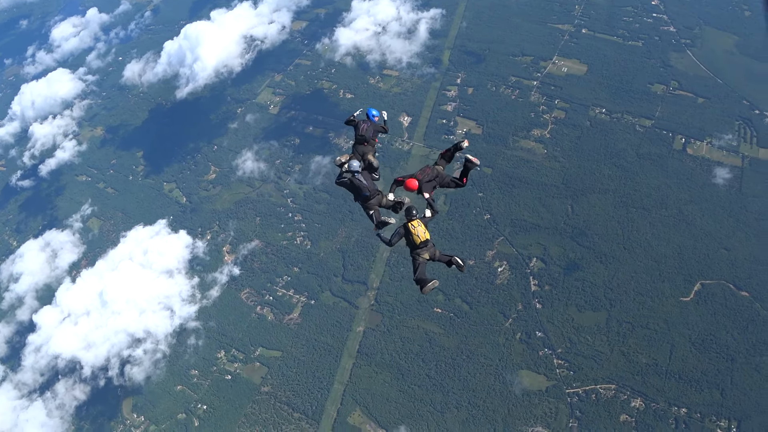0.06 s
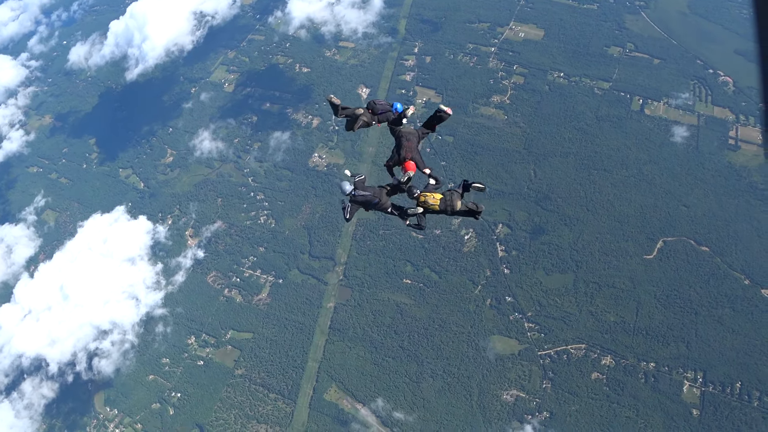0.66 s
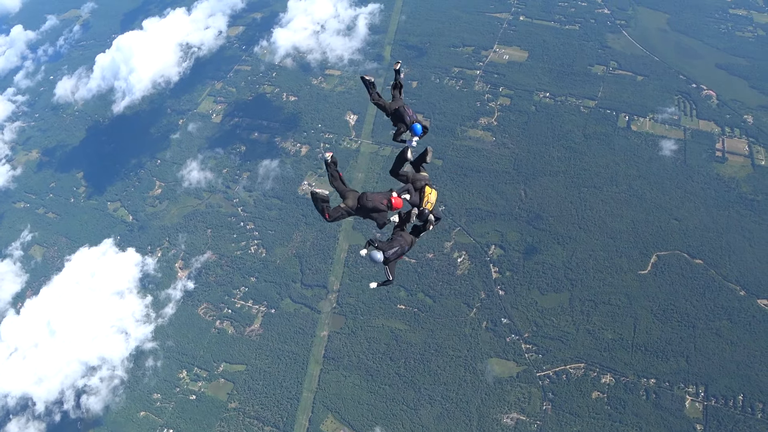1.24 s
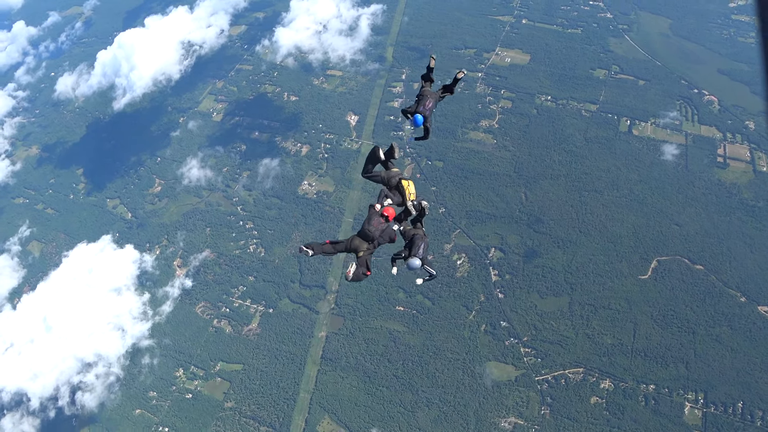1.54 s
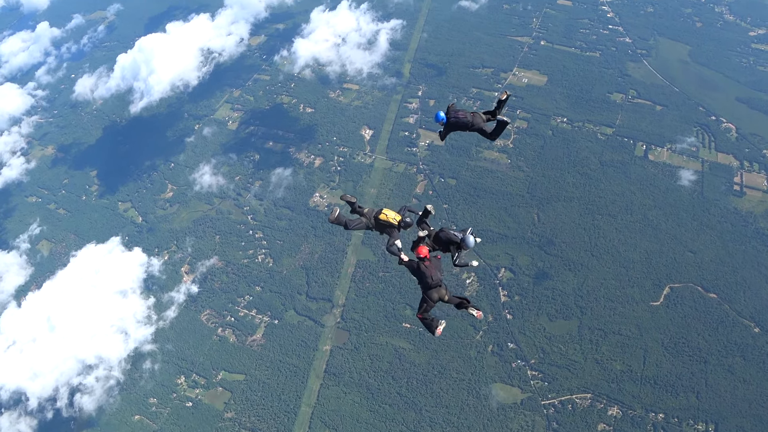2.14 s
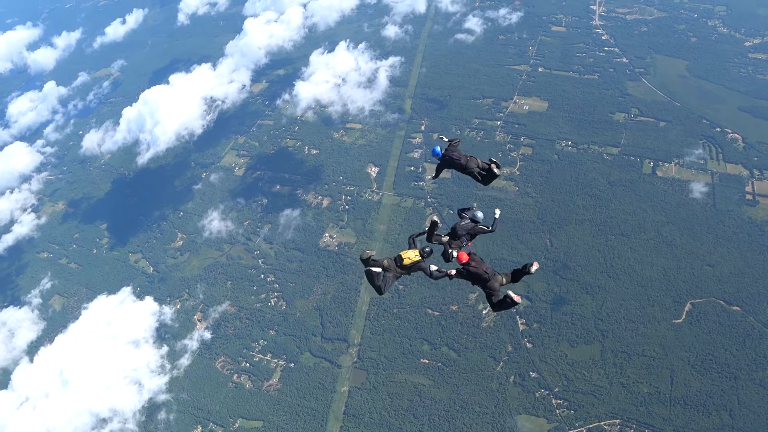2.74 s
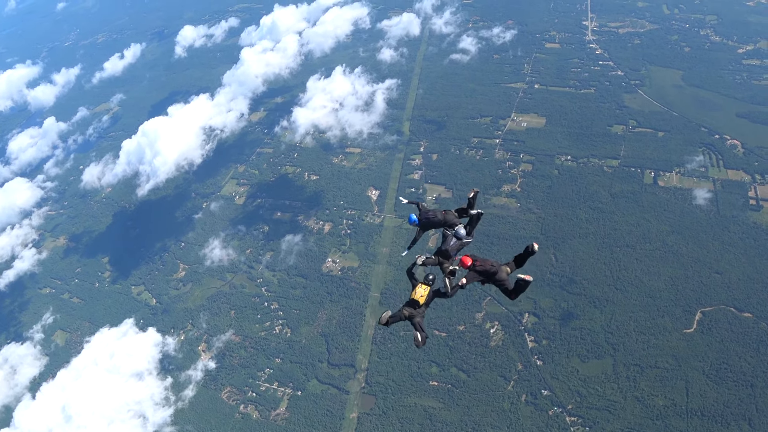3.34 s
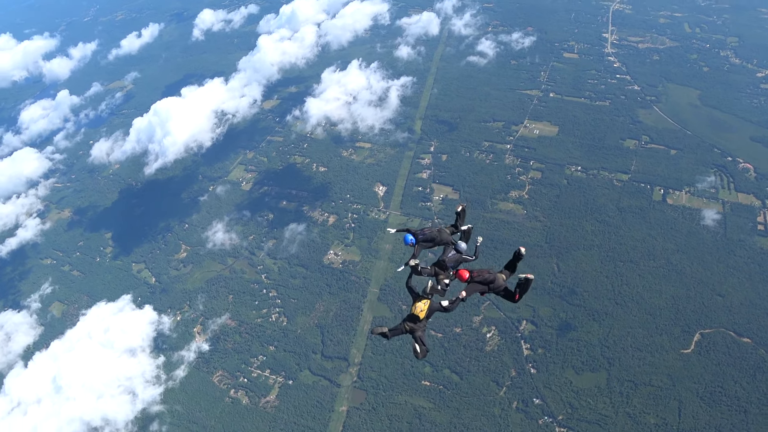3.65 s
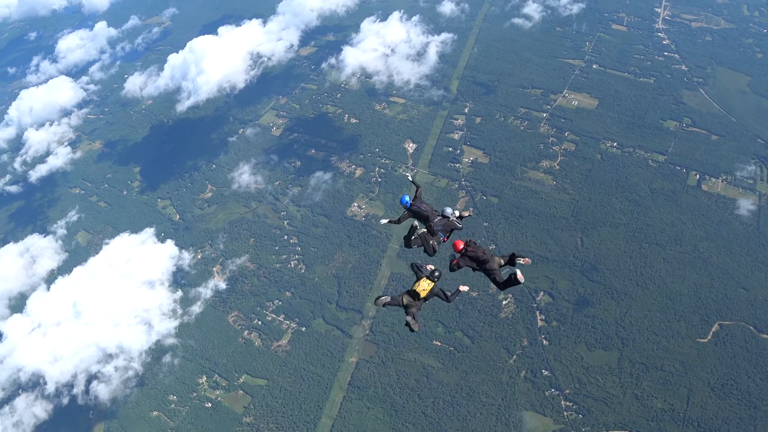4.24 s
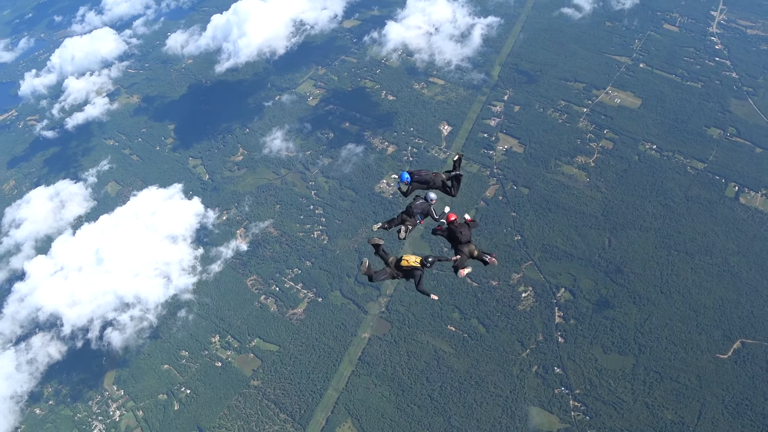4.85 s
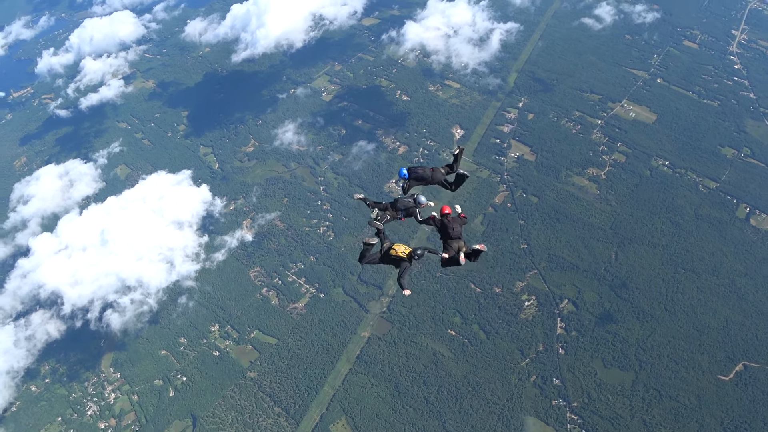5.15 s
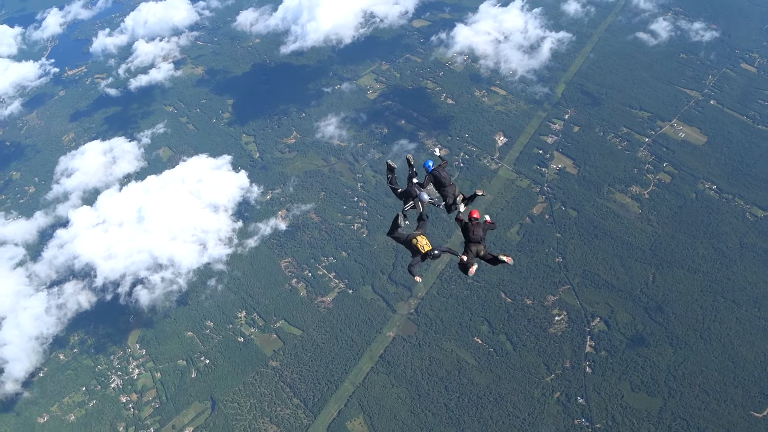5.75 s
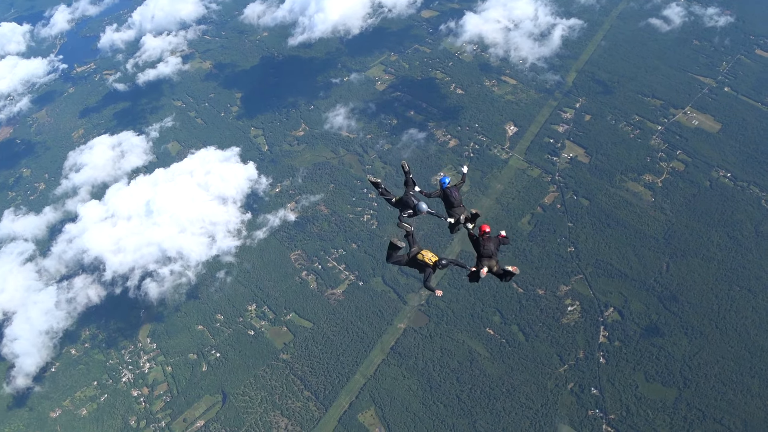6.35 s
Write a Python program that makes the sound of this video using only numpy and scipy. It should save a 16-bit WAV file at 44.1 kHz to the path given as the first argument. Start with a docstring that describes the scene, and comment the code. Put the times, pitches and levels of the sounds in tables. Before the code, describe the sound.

Air tears past a skydiver's helmet microphone in a constant loud rush, with low, fluttering gusts.

```python
"""Freefall: air tears past a helmet camera at terminal speed. From the start, large eddies buffet the
housing, smaller ones roar and rush in the two microphone ports, and the finest hiss and sputter.
The stream begins slightly left and centres within a second. As the helmet turns, the buffeting comes
and goes, hardest near 2.3 s: the roar swells with it and the hiss gives way. After 4 s it eases.
Throughout, the camera widens the port difference and levels the gusts; the loudest crests clip."""
import sys
import numpy as np
from scipy.fft import rfft, irfft
from scipy.io import wavfile
from scipy.ndimage import uniform_filter1d

SR = 44100
rng = np.random.default_rng(int(sys.argv[2]) if len(sys.argv) > 2 else 0)


def file_out(sig):
    """Save sig as 16-bit WAV at sys.argv[1]."""
    # one column per channel
    cols = np.atleast_2d(sig).T
    # limit, then scale
    lim = np.clip(cols, -1, 1)
    pcm = np.round(lim * 32767).astype(np.int16)
    wavfile.write(sys.argv[1], SR, pcm)


N = 291060


def undb(db):
    """Decibels to gain."""
    return 10 ** (np.asarray(db) / 20)


def colour(rows, hz):
    """Gain of a (frequency [Hz], level [dB]) table, joined on a log-frequency axis."""
    row_hz, row_db = np.transpose(rows)
    return undb(np.interp(np.log(hz), np.log(row_hz), row_db))


def curve(rows):
    """A (time [s], level [dB]) table at every sample."""
    return np.interp(np.arange(N) / SR, *np.transpose(rows))


def walk(rate_hz):
    """Random steps at rate_hz, smoothed twice; unit spread."""
    hold = max(int(SR / rate_hz), 2)
    steps = np.repeat(rng.standard_normal(N)[:N // hold + 1], hold)[:N]
    smooth = uniform_filter1d(uniform_filter1d(steps, hold), hold)
    return smooth / smooth.std()


def crossover(spectrum, hz, edge_hz):
    """Soft split of a spectrum into (below, above)."""
    below = 1 / (1 + (hz / edge_hz) ** 4)
    return spectrum * below, spectrum * (1 - below)


def low_pass(x, edge_hz, ramp_hz=60):
    """Brick-wall low-pass."""
    hz = np.arange(N // 2 + 1) * SR / N
    return irfft(rfft(x) * np.clip((edge_hz - hz) / ramp_hz + .5, 0, 1), N)


BAND_TOP_HZ = 11020
# Pressure common to both ports: (frequency [Hz], relative density [dB])
PRESSURE_SPECTRUM = [(20, -21), (45, -14.5), (70, -12.5), (110, -8), (170, -5), (280, -3.5), (560, -0.16),
                     (1000, -1.18), (1600, -3), (3000, -8), (5200, -13.5), (7800, -14.5), (9100, -18.5),
                     (11000, -17.5)]
# Port difference over common pressure: (frequency [Hz], level [dB])
PORT_DIFFERENCE = [(30, -12), (70, -8), (140, -5.5), (260, 0.5), (500, 3), (1000, 6), (1800, 6.5),
                   (3500, 4), (6000, 1), (10000, -2.5)]


def turbulence(hz, level_db=-13.5, cavity_hz=8000, cavity_width_hz=2100, cavity_db=1.36):
    """Pressure spectra at the left and right port: bass alike, middle opposed, treble unrelated."""
    resonance = undb(cavity_db / (1 + (2 * (hz - cavity_hz) / cavity_width_hz) ** 2))
    shape = colour(PRESSURE_SPECTRUM, hz) * resonance * (hz < BAND_TOP_HZ)
    common, difference = rfft(rng.standard_normal((2, N))) * shape
    difference = difference * colour(PORT_DIFFERENCE, hz)
    ports = np.array([common + difference, common - difference])
    return ports * undb(level_db) / irfft(common, N).std()


# Buffeting against its usual strength: (time [s], level [dB])
BUFFET_LEVEL = [(0, 1.5), (0.18, 0.5), (0.26, -3.5), (0.82, -3.5), (1.02, 2), (1.13, 5), (1.32, 0),
                (1.53, -2.5), (1.76, -1.5), (1.84, 3), (2.0, 4.5), (2.08, 1.5), (2.26, 8), (2.33, 6),
                (2.41, 6.5), (2.58, 3), (2.84, 4.5), (3.26, 0.2), (3.45, 6), (3.57, 1), (3.67, 5),
                (3.78, 2.5), (3.9, 4.5), (4.04, -0.5), (4.2, -1), (4.9, -1), (5.23, 1), (5.32, -2),
                (5.85, -2.5), (6.6, -1)]


def gusts(spread_db=0.5, rate_hz=23):
    """Buffeting in dB: slow swings as the helmet turns, quick random gusts on top."""
    return curve(BUFFET_LEVEL) + spread_db * walk(rate_hz)


def buffet(spectrum, gust_db, lump_db=1.05, lump_hz=26):
    """Large eddies shed from the helmet hit the housing in lumps."""
    return irfft(spectrum, N) * undb(gust_db + lump_db * walk(lump_hz))


# Roar before gusts and surges: (time [s], level [dB])
ROAR_BASE = [(0, -3), (0.4, -2.4), (0.95, -3), (1.2, -3), (1.7, -0.5), (2.22, -3), (2.4, -0.3), (2.78, 2.5),
             (3.1, 0.8), (3.6, 1.3), (3.9, 0.2), (4.4, 0.5), (5.5, 0), (5.95, -1), (6.6, 1.2)]


def roar(spectrum, gust_db, surge_db, gust_slope=0.75, flutter_db=0.64, flutter_hz=40):
    """Middle eddies tumble across the ports, fluttering and swelling with the buffeting."""
    level_db = curve(ROAR_BASE) + gust_slope * gust_db + surge_db
    return irfft(spectrum, N) * undb(level_db + flutter_db * walk(flutter_hz))


# Rush before gusts and surges: (time [s], level [dB])
RUSH_BASE = [(0, 0.5), (0.45, -0.2), (1.2, 1), (2.3, -1), (2.97, 0.5), (3.3, -0.6), (5.0, -0.5), (5.85, -2),
             (6.6, 0)]


def rush(spectrum, gust_db, surge_db, gust_slope=-0.19, surge_slope=0.17, flutter_db=1.18, flutter_hz=40):
    """Small eddies stream past in a coarse rush that yields slightly to the buffeting."""
    level_db = curve(RUSH_BASE) + gust_slope * gust_db + surge_slope * surge_db
    return irfft(spectrum, N) * undb(level_db + flutter_db * walk(flutter_hz))


def hiss(spectrum, gust_db, gust_slope=-0.33, duck_from_db=4.5, duck_slope=0.97):
    """Fine hiss sputters in bursts of a millisecond or two; it ducks under hard buffeting."""
    duck_db = duck_slope * np.maximum(gust_db - duck_from_db, 0)
    flicker_db = 0.85 * walk(rate_hz=40)
    sputter_db = 0.84 * walk(rate_hz=700)
    return irfft(spectrum, N) * undb(gust_slope * gust_db - duck_db + flicker_db + sputter_db)


def yaw(left_lead_db=1.1, centred_s=0.98):
    """Port gains: the stream favours the left, then centres."""
    lead_db = left_lead_db * np.maximum(1 - np.arange(N) / SR / centred_s, 0)
    return undb(np.array([lead_db, -lead_db]) / 2)


# Surges of the roar: (crest time [s], length [s], level [dB])
ROAR_SURGES = [(0.56, 0.1, 4), (1.84, 0.19, 3.5), (4.89, 0.22, 0.7), (5.2, 0.24, 2.5)]


def surges():
    """Boost in dB as the stream catches the ports, each a smooth rise and fall."""
    t = np.arange(N) / SR
    return sum(crest_db * np.cos(np.pi * np.clip((t - crest_s) / length_s, -.5, .5)) ** 2
               for crest_s, length_s, crest_db in ROAR_SURGES)


def scene():
    """One turbulent stream, split by eddy size; it sounds deeper and duller under hard buffeting."""
    hz = np.maximum(np.arange(N // 2 + 1) * SR / N, 1)
    large, rest = crossover(turbulence(hz), hz, edge_hz=280)
    middle, rest = crossover(rest, hz, edge_hz=754)
    small, fine = crossover(rest, hz, edge_hz=2280)
    gust_db, surge_db = gusts(), surges()
    wind = buffet(large, gust_db)
    wind += roar(middle, gust_db, surge_db)
    wind += rush(small, gust_db, surge_db)
    wind += hiss(fine, gust_db)
    return wind * yaw()


def gain_control(x, target_db=-7.5, window_s=.05, strength=0.56):
    """The camera pulls the short-term level of both channels partway to a target."""
    power = uniform_filter1d(np.mean(x ** 2, axis=0), int(window_s * SR))
    return x * undb(strength * (target_db - 10 * np.log10(power)))


def record(dry, overload_peak=1.05):
    """The levelled wind overloads, loses its treble above 11 kHz, then clips at full scale."""
    overloaded = np.clip(gain_control(dry), -overload_peak, overload_peak)
    narrow = low_pass(overloaded, BAND_TOP_HZ)
    return low_pass(np.clip(narrow, -1, 1), edge_hz=15800)


dry = scene()
out = record(dry)
file_out(out)
```